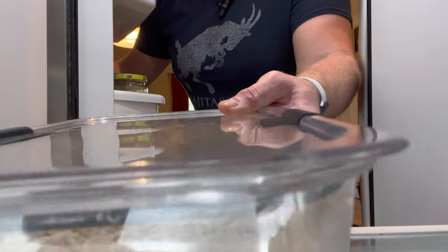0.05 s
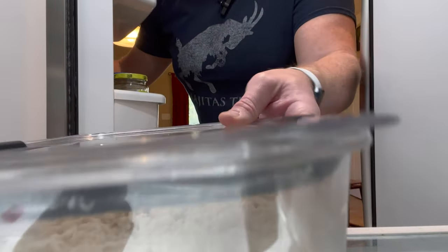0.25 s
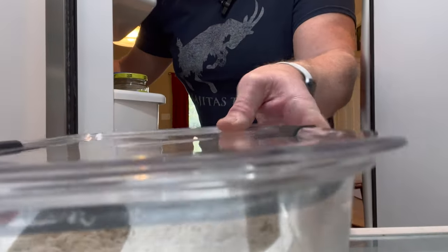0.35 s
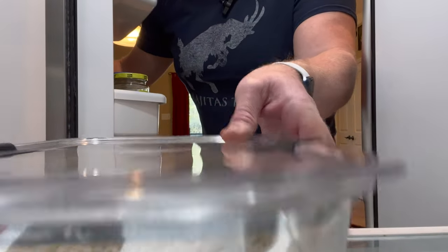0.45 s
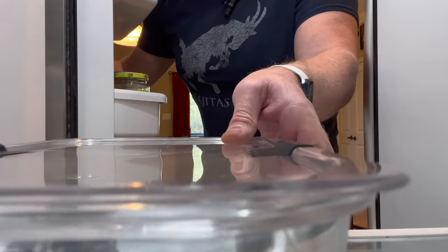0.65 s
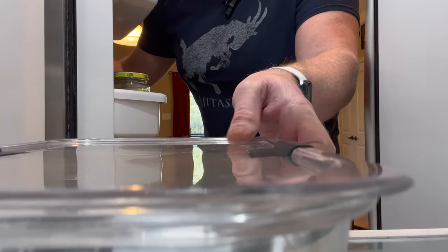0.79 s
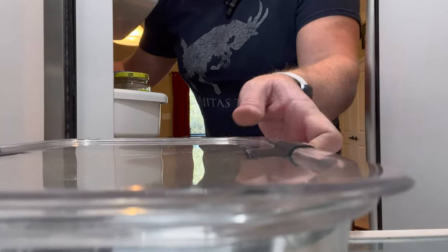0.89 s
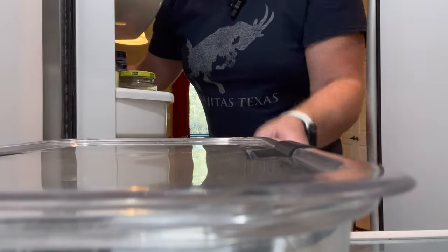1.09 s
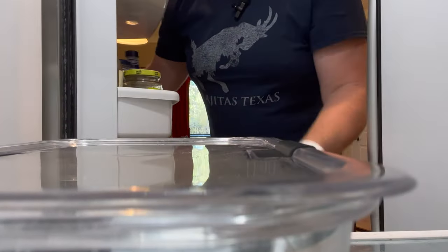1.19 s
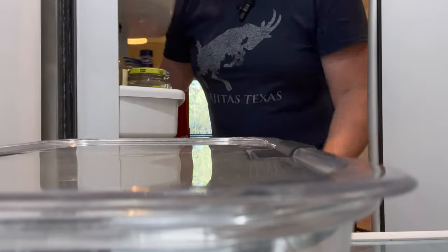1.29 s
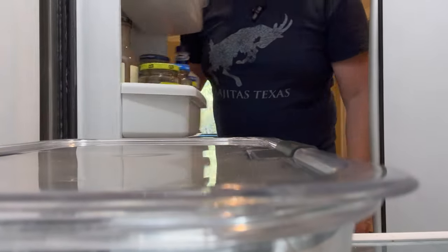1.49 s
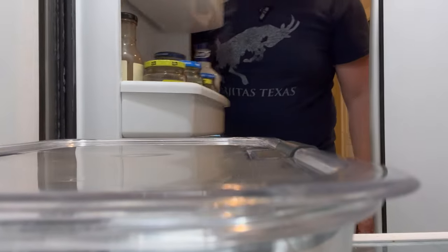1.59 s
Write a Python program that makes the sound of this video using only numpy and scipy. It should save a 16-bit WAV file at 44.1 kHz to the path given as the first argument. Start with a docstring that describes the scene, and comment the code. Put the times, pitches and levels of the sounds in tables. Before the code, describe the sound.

A lidded container lands on a glass fridge shelf: light ticks, a hard double knock, two more knocks as it rocks flat, then a small release clink over faint hum, heard very close inside the fridge.

```python
"""A fridge hums under faint air noise and rustling cloth: wavering tones, shaped noise. Light ticks come first.
A lidded food container lands on a glass shelf on one edge, then rocks flat in two more knocks.
Each contact strikes decaying modes and a dense noise clatter; soft pushes make the shelf shudder.
The hand lets go with a soft bump, a few ticks and a clink; noise-band scuffs and thin whistles end it."""
import sys
import numpy as np
from scipy import signal
from scipy.io import wavfile

SR = 44100
rng = np.random.default_rng(int(sys.argv[2]) if len(sys.argv) > 2 else 0)


def wav_record(signal):
    """Record a signal, one row per channel, as 16-bit PCM in the file named by sys.argv[1]."""
    frames = np.transpose(np.atleast_2d(signal))
    bounded = np.clip(frames, -1, 1)
    # unit amplitude maps onto the largest positive 16-bit level
    quanta = np.round(bounded * 32767).astype(np.int16)
    wavfile.write(sys.argv[1], SR, quanta)


N = 72765
TIME_S = np.arange(N) / SR

# compressor tones: pitch_hz, level_db_rms
HUM = [(59.4, -58), (119.2, -51), (214.5, -59), (346, -68.5), (963.6, -84), (3327, -92), (7359, -89.5)]
HUM_WAVER_DB, HUM_WAVER_HZ = 0.5, 1.67
HUM_WANDER_RAD, HUM_WANDER_HZ = 0.11, 8.5
# steady air noise before AIR_GAIN_DB: freq_hz, gain_db
AIR = [(25, -22), (55, -34.5), (100, -24.5), (250, -31), (500, -41), (1000, -55.5), (2000, -63),
       (4000, -65.5), (8000, -68.5), (14000, -74)]
AIR_GAIN_DB = -9
# clothes rustle as the arm draws back: time_s, gain_db
RUSTLE_LEVEL = [(0, 3), (.1, -2.5), (.85, -4.5), (1.1, -3), (1.32, -1.5), (1.44, -2.5), (1.53, 1),
                (1.65, 0)]
# rustle spectrum before RUSTLE_LEVEL: freq_hz, gain_db
RUSTLE = [(100, -56), (300, -49.5), (1000, -53.5), (2500, -65), (6000, -73.5), (13000, -75.5)]
RUSTLE_FLUTTER_DB, RUSTLE_FLUTTER_HZ = 0.5, 60

# light contacts of fingers, lid and rim: start_s, level_db, bass_db, middle_db, treble_db
TICKS = [(0.020, -31, -14, 6, -4), (0.044, -31, 15, -0.5, -0.5), (0.132, -36.5, 11, 3, 1),
         (0.188, -36.5, 11, 6, 5), (0.29, -30, 0, 8, 7.5), (0.958, -35.5, 22, 4, 14.5),
         (0.9642, -23.5, -7, 13, 12), (1.025, -28, -19, 4.5, -6), (1.126, -35.5, 7, 12.5, -2)]
# base strikes the shelf: start_s, level_db, bass_db, middle_db, treble_db
KNOCKS = [(0.2115, -19, -12, -4, 3), (0.2286, -3.5, -3, 5.5, 3), (0.2404, -2, 3, -6.5, -3.5),
          (0.4385, -4.5, -0.5, 1.5, 0.5), (0.509, 0.5, 3.5, 0.5, 1.5)]
# where contact colour applies: bass_hz, reference_hz (0 dB), middle_hz, treble_hz
COLOUR_HZ = (170, 480, 1200, 4000)
# glass shelf under its load: pitch_hz, level_db, t60_s
SHELF_MODES = [(117.5, -27, 0.18), (141, -65, 0.061), (189.8, -30, 0.13), (214.1, -32, 0.13),
               (253.8, -23, 0.11), (275, -35.5, 0.22), (422.6, -29.5, 0.18), (499.7, -21.5, 0.086),
               (534.4, -33, 0.21), (600, -51, 0.057), (724, -31.5, 0.15), (808, -46, 0.27),
               (826, -37, 0.089), (987, -35, 0.034)]
# container walls and lid: pitch_hz, level_db, t60_s
CONTAINER_MODES = [(1030, -33.5, 0.055), (1173, -43, 0.18), (1298, -46, 0.17), (1341, -41, 0.063),
                   (1444, -34, 0.091), (1508, -37, 0.096), (1636, -39.5, 0.093), (2010, -45, 0.14),
                   (2621, -43.5, 0.086), (3156, -48, 0.073), (3630, -53, .075), (4550, -46, 0.064),
                   (4950, -48, 0.068)]
STRIKE_SPREAD_DB, TICK_RING_GAIN_DB = 4, -5
BUILD_AT_1KHZ_S = 0.0008
# crowd of short-lived modes before CLATTER_GAIN_DB: freq_hz, gain_db, t60_s
CLATTER = [(30, -22, 0.15), (88, -14.5, 0.41), (203, -2, 0.3), (312, -4, .11), (646, 1, 0.11),
           (1120, -10.5, 0.092), (1940, -18, 0.057), (4300, -20, 0.052), (6770, -46.5, 0.12),
           (14100, -39, 0.042)]
# kitchen echo before CLATTER_GAIN_DB: freq_hz, gain_db, t60_s
KITCHEN = [(100, -8, .5), (200, -23, 0.29), (348, -17, 0.79), (604, -24, 0.68), (1170, -28.5, 0.47),
           (2160, -40.5, 0.55), (4250, -46.5, 0.66), (7400, -68, 0.26), (13900, -54, 0.37)]
CLATTER_GAIN_DB, CLATTER_HOLD_S, KITCHEN_BUILD_S = -7.5, 0.0031, 0.0089

# shelf takes or sheds weight: start_s, level_db, length_s
PUSHES = [(0.2346, -36, 0.0041), (0.278, -42.5, 0.013), (0.480, -26, 0.019), (0.525, -28.5, 0.015),
          (0.592, -38.5, 0.016), (0.9566, -34, 0.0049), (1.132, -42.5, 0.0037)]
# slow bending of the shelf: pitch_hz, level_db, t60_s
SHUDDER = [(45.9, -2.5, 0.37), (78.7, -3, 0.2), (115.1, 7, 0.17)]
# small clink as the hand leaves: pitch_hz, level_db, t60_s
CLINK = [(1190, -44, 0.032), (1272, -41.5, 0.05), (2910, -55.5, 0.039), (3240, -56, 0.059)]
CLINK_START_S, CLINK_BUILD_S = 1.0262, 0.0021
# soft rubs: start_s, length_s, centre_hz, peak_level_db_rms
SCUFFS = [(1.120, .022, 2050, -62), (1.165, .04, 550, -55), (1.285, .035, 850, -59),
          (1.394, .022, 950, -56), (1.30, .09, 225, -49), (1.50, .045, 1100, -58), (1.50, .05, 345, -54)]
SCUFF_WIDTH_SHARE = 0.22  # of centre_hz
# thin high whistles: start_s, length_s, start_hz, end_hz, peak_level_db_rms
WHISTLES = [(1.13, 0.035, 11500, 12300, -80), (1.186, 0.07, 10100, 11000, -83),
            (1.216, 0.087, 8100, 9700, -75.5), (1.22, 0.097, 11100, 12200, -77.5),
            (1.285, 0.063, 10800, 9000, -74.5), (1.325, 0.084, 12200, 11300, -78),
            (1.43, .055, 12400, 11200, -72), (1.52, .04, 10800, 10300, -83)]
WHISTLE_WIDTH_HZ = 210
LOW_CUT_HZ, HIGH_CUT_HZ = 25, 14400


def from_db(db):
    """Decibels to gain."""
    return 10 ** (np.asarray(db) / 20)


def at_hz(points, hz, column=1):
    """Read one table column on a log-frequency axis."""
    table = np.array(points)
    return np.interp(np.log(hz), np.log(table[:, 0]), table[:, column])


def drift(rate_hz):
    """Low-passed noise of standard deviation 1; the filter settles before it is used."""
    pole = np.exp(-2 * np.pi * rate_hz / SR)
    white = rng.standard_normal(2 * N)
    slow = signal.lfilter([1], [1, -2 * pole, pole * pole], white)[N:]
    return slow / slow.std()


def noise_bands():
    """Half-octave bands of unit white noise: centre_hz, band."""
    edges_hz = 22 * 2 ** np.arange(0, 9.6, 0.5)
    for low_hz, high_hz in zip(edges_hz, edges_hz[1:]):
        sos = signal.butter(2, [low_hz, high_hz], "band", fs=SR, output="sos")
        band = signal.sosfilt(sos, rng.standard_normal(N + SR))[SR:]
        yield np.sqrt(low_hz * high_hz), band


def coloured(spectrum):
    """Steady noise with the given spectrum."""
    return sum(from_db(at_hz(spectrum, hz)) * band for hz, band in noise_bands())


def fridge():
    """Compressor tones waver slightly in level and phase over steady air noise."""
    hum = np.zeros(N)
    for hz, level_db in HUM:
        amplitude = np.sqrt(2) * from_db(level_db + HUM_WAVER_DB * drift(HUM_WAVER_HZ))
        phase = 2 * np.pi * hz * TIME_S + HUM_WANDER_RAD * drift(HUM_WANDER_HZ)
        hum += amplitude * np.sin(phase)
    return hum + from_db(AIR_GAIN_DB) * coloured(AIR)


def rustle():
    """Cloth moves unevenly as the arm reaches in and draws back: shaped, fluttering noise."""
    level_db = np.interp(TIME_S, *np.transpose(RUSTLE_LEVEL))
    flutter_db = RUSTLE_FLUTTER_DB * drift(RUSTLE_FLUTTER_HZ)
    return from_db(level_db + flutter_db) * coloured(RUSTLE)


def since(start_s):
    """Seconds since a moment, zero before it."""
    return np.maximum(TIME_S - start_s, 0)


def dying(age_s, t60_s):
    """Exponential decay, 60 dB per t60_s."""
    return np.exp(-np.minimum(np.log(1000) * age_s / t60_s, 40))


def ring(start_s, hz, t60_s):
    """A struck mode: decaying sine."""
    age_s = since(start_s)
    return np.sin(2 * np.pi * hz * age_s) * dying(age_s, t60_s)


def building(hz):
    """Ringing builds up; low bending waves travel more slowly and take longer."""
    return 1 - np.exp(-TIME_S / BUILD_AT_1KHZ_S * np.sqrt(hz / 1000))


def strength(contact, hz):
    """How hard a contact drives a given frequency."""
    _, level_db, bass_db, middle_db, treble_db = contact
    colour_db = np.interp(np.log(hz), np.log(COLOUR_HZ), [bass_db, 0, middle_db, treble_db])
    return from_db(level_db + colour_db)


def ringing(contacts):
    """Each contact strikes all main modes: shelf in one polarity, container in alternating ones."""
    out = np.zeros(N)
    modes = SHELF_MODES + CONTAINER_MODES
    container_signs = (-1) ** np.arange(len(CONTAINER_MODES))
    signs = np.concatenate([np.ones(len(SHELF_MODES)), container_signs])
    chance_db = STRIKE_SPREAD_DB * rng.standard_normal((len(contacts), len(modes)))
    for k, (hz, level_db, t60_s) in enumerate(modes):
        mode = signs[k] * ring(0, hz, t60_s) * building(hz)
        for contact, extra_db in zip(contacts, chance_db[:, k]):
            start = int(contact[0] * SR)
            gain = strength(contact, hz) * from_db(level_db + extra_db)
            out[start:] += gain * mode[:N - start]
    return out


def clatter(contacts):
    """Dense modes build up inside the fridge and die fast; the kitchen adds a weak, long tail."""
    out = np.zeros(N)
    for hz, band in noise_bands():
        near_decay = dying(since(CLATTER_HOLD_S), at_hz(CLATTER, hz, column=2))
        near = from_db(at_hz(CLATTER, hz)) * building(hz) * near_decay
        far_build = 1 - np.exp(-TIME_S / KITCHEN_BUILD_S)
        far_decay = dying(TIME_S, at_hz(KITCHEN, hz, column=2))
        far = from_db(at_hz(KITCHEN, hz)) * far_build * far_decay
        response = near ** 2 + far ** 2
        power = np.zeros(N)  # contacts add in power
        for contact in contacts:
            start = int(contact[0] * SR)
            power[start:] += strength(contact, hz) ** 2 * response[:N - start]
        out += band * np.sqrt(power)
    return from_db(CLATTER_GAIN_DB) * out


def shudder():
    """Soft pushes bend the shelf and set its lowest modes swinging."""
    force = np.zeros(N)
    for start_s, level_db, length_s in PUSHES:
        along = np.minimum(since(start_s) / length_s, 1)
        unit_push = np.sin(np.pi * along) ** 2 * 2 / (length_s * SR)  # samples sum to 1
        force += from_db(level_db) * unit_push
    response = sum(from_db(level_db) * ring(0, hz, t60_s) for hz, level_db, t60_s in SHUDDER)
    return signal.fftconvolve(force, response)[:N]


def clink():
    """One small, clear clink: a few modes with a soft onset."""
    onset = 1 - np.exp(-since(CLINK_START_S) / CLINK_BUILD_S)
    return onset * sum(from_db(level_db) * ring(CLINK_START_S, hz, t60_s) for hz, level_db, t60_s in CLINK)


def narrow_noise(hz, width_hz):
    """Noise band around a steady or gliding pitch; rms about 1."""
    phase = 2 * np.pi * np.cumsum(hz * np.ones(N)) / SR
    return drift(width_hz) * np.sin(phase) + drift(width_hz) * np.cos(phase)


def scuffs():
    """Short, soft rubs as the hand draws away and the person steps back: swelling noise bands."""
    out = np.zeros(N)
    for start_s, length_s, hz, level_db in SCUFFS:
        swell = np.sin(np.pi * np.minimum(since(start_s) / length_s, 1))
        out += from_db(level_db) * swell * narrow_noise(hz, SCUFF_WIDTH_SHARE * hz)
    return out


def whistles():
    """Very faint, narrow bands of hiss glide, swell and fade."""
    out = np.zeros(N)
    for start_s, length_s, start_hz, end_hz, level_db in WHISTLES:
        along = np.minimum(since(start_s) / length_s, 1)
        glide_hz = start_hz + (end_hz - start_hz) * along
        out += from_db(level_db) * np.sin(np.pi * along) * narrow_noise(glide_hz, WHISTLE_WIDTH_HZ)
    return out


def scene():
    """Fridge and person, with the container on its shelf; one channel."""
    background = fridge() + rustle()
    strikes = from_db(TICK_RING_GAIN_DB) * ringing(TICKS) + ringing(KNOCKS) + clatter(TICKS + KNOCKS)
    return (background + strikes + shudder() + clink() + scuffs() + whistles())[None]


def record(dry):
    """The microphone loses the deepest bass; the top is cut steeply."""
    low_cut = signal.butter(4, LOW_CUT_HZ, "high", fs=SR, output="sos")
    high_cut = signal.ellip(10, 0.2, 70, HIGH_CUT_HZ, fs=SR, output="sos")  # ripple, stopband in dB
    return signal.sosfilt(high_cut, signal.sosfilt(low_cut, dry))


dry = scene()
out = record(dry)
wav_record(out)
```